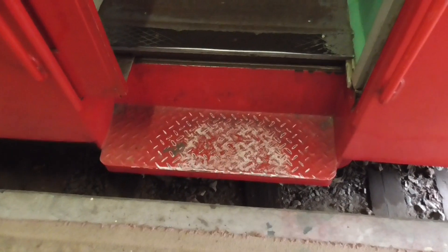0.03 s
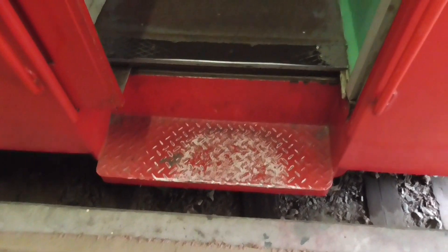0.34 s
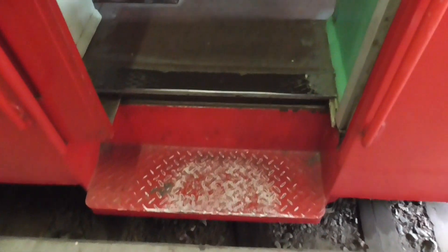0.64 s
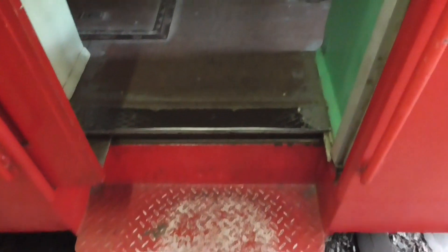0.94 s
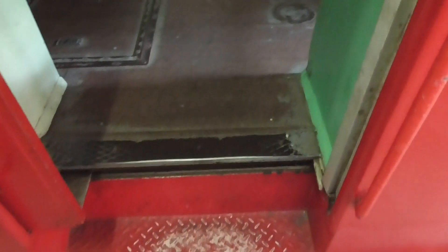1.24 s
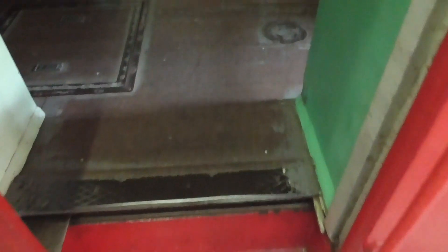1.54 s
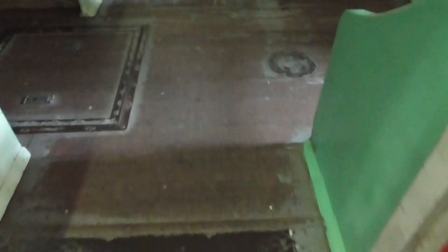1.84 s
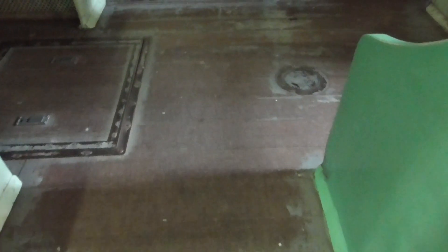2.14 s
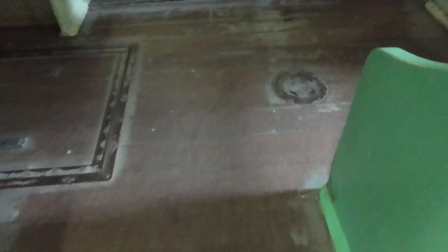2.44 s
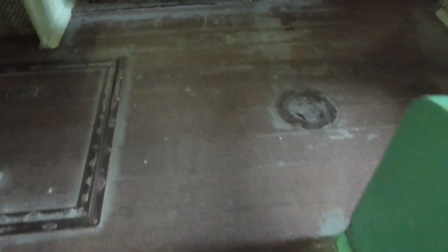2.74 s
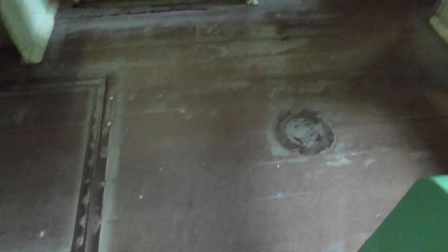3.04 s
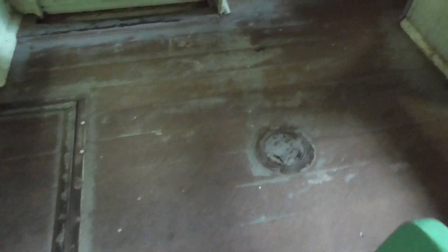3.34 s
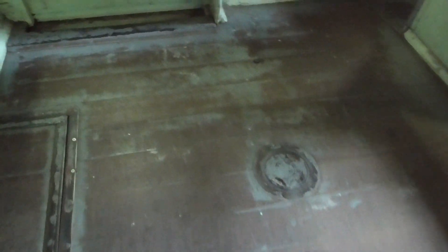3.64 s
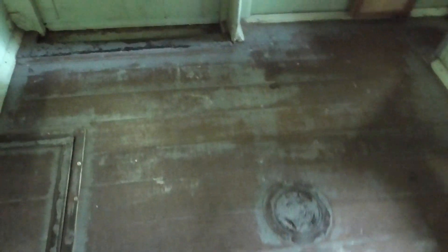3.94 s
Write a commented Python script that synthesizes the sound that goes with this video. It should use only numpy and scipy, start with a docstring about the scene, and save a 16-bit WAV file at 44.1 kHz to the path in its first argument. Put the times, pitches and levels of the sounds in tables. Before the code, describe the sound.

A standing train hisses air with thin whistles, then sounds quieter inside, with soft footsteps.

```python
"""A steady hiss of air or steam comes from a standing train, ringing with broad pipe tones and thin whistles.
The listener passes through the carriage door, which shuts out the direct hiss.
A softer hiss, spread out by echoes inside the carriage, remains over a low rumble.
A faint hum comes and goes on the way in, and later soft footsteps thump on the hollow floor."""
import sys
import numpy as np
from scipy import signal
from scipy.fft import rfft, irfft, next_fast_len
from scipy.io import wavfile
from scipy.ndimage import uniform_filter1d

SR = 44100
rng = np.random.default_rng(int(sys.argv[2]) if len(sys.argv) > 2 else 0)


def generate_wav(signal):
    """Clip the signal to [-1, 1] and save it as 16-bit WAV at the path in sys.argv[1]."""
    frames = np.transpose(np.atleast_2d(signal))
    scaled = np.clip(frames, -1, 1) * 32767
    pcm = np.round(scaled).astype(np.int16)
    wavfile.write(sys.argv[1], SR, pcm)


N = 176400
FRAME, HOP = 2048, 512  # noise is shaped in short overlapping frames; both in samples
HZ = np.fft.rfftfreq(FRAME, 1 / SR)[:, None]
TIMES = np.arange(N // HOP + 2) * HOP / SR


def amp(db):
    """Turn decibels into a gain."""
    return 10 ** (np.asarray(db) / 20)


def over_pitch(rows):
    """Join rows that start with a pitch into one curve per remaining column."""
    hz, *columns = np.transpose(rows)
    return [np.interp(np.log(HZ + 1), np.log(hz), column) for column in columns]


def over_time(rows):
    """Join rows that start with a time into one curve per remaining column."""
    time_s, *columns = np.transpose(rows)
    return [np.interp(TIMES, time_s, column) for column in columns]


def bell(x, centre, width):
    """A smooth bump of height 1."""
    return np.exp(-.5 * ((x - centre) / width) ** 2)


def whistle_peak(hz):
    """A whistle lifts only a very narrow band around its pitch."""
    return bell(HZ, hz, 0.0056 * hz)


def low_cut_db(edge_hz):
    """A steep fall in level below the edge."""
    return -10 * np.log10(1 + (edge_hz / (HZ + 1)) ** 4)


def patches(depth_db, bands, frames):
    """Random rises and dips in level, smoothed over nearby pitch bands and frames."""
    field = rng.standard_normal((len(HZ), len(TIMES)))
    field = uniform_filter1d(uniform_filter1d(field, bands, axis=0), frames, axis=1)
    return depth_db * field / np.sqrt(np.mean(field ** 2))


def ridges():
    """Reflections cut fine, slowly shifting ridges into a hiss."""
    return patches(depth_db=3, bands=2, frames=40)


def shaped_noise(level_db, stereo, pan_db=0, lead_s=0):
    """Stereo noise with the given level per Hz; a likeness of 1 feeds both ears the same noise."""
    likeness, lead_rad, left_db = over_pitch(stereo)
    white = rng.standard_normal((2, N + FRAME))
    common, apart = signal.stft(white, nperseg=FRAME, noverlap=FRAME - HOP)[2][..., :len(TIMES)]
    angle = np.arccos(np.clip(likeness, 0, 1)) / 2
    common, apart = np.cos(angle) * common, np.sin(angle) * apart
    # one ear hears it louder and earlier than the other
    lean = amp((left_db + pan_db) / 2) * np.exp(.5j * (lead_rad + 2 * np.pi * HZ * lead_s))
    ears = np.array([(common + apart) * lean, (common - apart) / lean])
    gain = amp(level_db) * np.sqrt(SR / (abs(lean) ** 2 + abs(lean) ** -2))
    return signal.istft(ears * gain, nperseg=FRAME, noverlap=FRAME - HOP)[1][:, :N]


def jet_hiss():
    """The jet rings in a pipe and whistles; its tone shifts as the listener moves, then it is shut out."""
    # tone of the direct hiss: pitch_hz, level_db
    tone = [(450, -16), (750, -9), (1000, -6.5), (1150, 0.3), (1420, 2), (1750, -7.5), (2200, 0.75),
            (2700, -6.5), (3150, -1.1), (3500, -2), (4000, 7), (4400, 8), (4900, 3.5), (5500, -1.0),
            (6400, -0.5), (6950, 5.5), (7500, 11), (7900, 9.5), (8500, 3), (9400, 2), (10600, 9.5),
            (11700, 5.5), (12300, 6.5), (13500, -4), (15200, -13.5)]
    # its loudness on the way in: time_s, level_db
    loudness = [(0, -69), (.6, -68), (1.2, -68.5), (1.5, -70.5), (1.85, -72), (2.2, -68.5), (2.5, -73),
                (2.68, -78), (3.0, -89), (4, -102)]
    # the treble against the rest: time_s, boost_db
    treble = [(0, -10), (1.15, -4.5), (1.7, -2.5), (2.2, -7.5), (2.7, -1), (3.2, -8)]
    # the upper middle, which swells in the doorway: time_s, boost_db
    middle = [(0, -3), (1.5, -1.5), (2.3, 2), (2.7, 4.5)]
    # the two lower pipe tones: time_s, pitch_hz, boost_db
    first_pipe = [(0, 1430, 9), (.7, 1432, 6.5), (1.05, 1362, 10.5), (1.6, 1385, 4), (2.2, 1525, 6),
                  (2.7, 1446, 12.5)]
    second_pipe = [(0, 4130, 5.5), (1.1, 4540, 1), (1.5, 4170, -2.5), (2.2, 4140, -2), (2.7, 4100, -1)]
    # the high pipe tone: time_s, pitch_hz, boost_db, left_over_right_db
    high_pipe = [(0, 7350, -1, 2), (.55, 7550, 2.5, 4.5), (1.2, 7320, 4, -7), (1.7, 7660, 5.5, -7.5),
                 (1.88, 7860, 5.5, -7), (2.25, 7800, 3.5, -3), (2.48, 7650, 1.5, -1.5), (2.7, 7600, -4, -3)]
    # whistles that swell and fade: pitch_hz, boost_db, strongest_s, spread_s
    whistles = [(1128, 8.5, 1.3, 0.48), (1367, 0, 1.02, 0.12), (1470, 1, 0.95, 2.3), (2026, 4, 1, 1),
                (2140, 1.5, 0.44, 1.8), (3986, 10, 0.2, 0.28), (4325, 5.5, 1.13, .4), (4530, 7, 1.2, 0.6),
                (4835, 8.5, .5, 0.91), (4800, 10, 1.77, .14), (4240, 10.5, 2.57, 0.11),
                (7510, -0.5, 1.1, 0.24), (7340, 11, 1.68, 0.13), (7660, 6, 2.24, .22)]
    # the hiss at the two ears: pitch_hz, likeness (0-1), left_lead_radians, left_over_right_db
    stereo = [(500, 0.93, .05, 0), (1400, 0.91, .25, 1), (2800, 0.85, 0.3, 0.1), (4330, 0.81, 1.62, 1),
              (4480, 0, 1, 10), (4990, 0.87, 0.55, 2), (5670, 1, 1.03, 3), (7330, 1, 1.22, -1),
              (9960, 0.58, 3.4, 1), (11700, 0.69, 2.95, -5), (14700, 0.05, 6.1, 0)]
    # the jet's direction, at first to the left: time_s, left_over_right_db, left_lead_s
    direction = [(.2, 2.5, .000012), (.8, -0.5, 0), (2.2, 0.7, -.000006)]
    first_hz, first_db = over_time(first_pipe)
    second_hz, second_db = over_time(second_pipe)
    high_hz, high_db, high_pan_db = over_time(high_pipe)
    high_band = bell(HZ, high_hz, width=340)
    pipe_db = first_db * bell(HZ, first_hz, width=37) + second_db * bell(HZ, second_hz, width=245)
    pipe_db += high_db * high_band
    treble_db = over_time(treble)[0] * HZ ** 4 / (HZ ** 4 + 7700 ** 4)  # mostly above 7700 Hz
    middle_db = over_time(middle)[0] * bell(HZ, centre=2970, width=1180)
    tone_db = over_pitch(tone)[0] + low_cut_db(edge_hz=110) + treble_db + middle_db
    whistle_db = sum(db * whistle_peak(hz) * bell(TIMES, strongest_s, spread_s)
                     for hz, db, strongest_s, spread_s in whistles)
    drift_db = ridges() + patches(depth_db=.5, bands=25, frames=12)
    flutter_db = patches(depth_db=.83, bands=200, frames=3)
    level_db = over_time(loudness)[0] + tone_db + pipe_db + whistle_db + drift_db + flutter_db
    pan_db, lead_s = over_time(direction)
    return shaped_noise(level_db, stereo, pan_db + high_pan_db * high_band, lead_s)


def carriage_hiss():
    """The hiss after it has bounced many times around the carriage."""
    # tone of the hiss inside: pitch_hz, level_db
    tone = [(450, -6), (800, -10.5), (1100, -6), (1480, -0.8), (1800, -13), (2250, -12.5), (2800, -17),
            (3400, -12), (4300, 1), (5200, -14), (6100, -18.5), (6800, -14), (7550, -1), (8300, -14.5),
            (9400, -15.5), (10700, -5.5), (11800, -12), (12800, -13), (15300, -55)]
    # its loudness: time_s, level_db
    loudness = [(0, -73), (2.3, -81.5), (2.8, -68.5), (3.4, -69.5), (4, -71)]
    # thin whistles in it: pitch_hz, boost_db
    whistles = [(1448, 3), (1535, 9)]
    # the hiss at the two ears: pitch_hz, likeness (0-1), left_lead_radians, left_over_right_db
    stereo = [(500, 0.81, 0.16, 0), (1300, 0.62, 0.22, -1.8), (2700, 1, 0.22, -0.49),
              (4200, 0.56, 0.38, -0.74), (6100, 0.8, 0, 0), (8500, .1, 0.096, -0.67)]
    tone_db = over_pitch(tone)[0] + low_cut_db(edge_hz=550)
    whistle_db = sum(db * whistle_peak(hz) for hz, db in whistles)
    drift_db = ridges() + patches(depth_db=1, bands=25, frames=12)
    return shaped_noise(over_time(loudness)[0] + tone_db + whistle_db + drift_db, stereo)


def rumble():
    """Low background noise that wavers at random."""
    # tone of the rumble: pitch_hz, level_db
    tone = [(45, -21), (75, -15.5), (100, -11), (135, 0), (190, -7.5), (250, -4.5), (340, -9), (480, -11),
            (800, -33)]
    # its loudness: time_s, level_db
    loudness = [(0, -74.5), (1.05, -69.5), (1.3, -76), (1.75, -77), (2.45, -69.5), (3.1, -71.7)]
    # the rumble at the two ears: pitch_hz, likeness (0-1), left_lead_radians, left_over_right_db
    stereo = [(120, 0.97, 0, -1.9), (400, 0.89, 0, -0.63)]
    drift_db = patches(depth_db=3.5, bands=3, frames=14)
    return shaped_noise(over_time(loudness)[0] + over_pitch(tone)[0] + drift_db, stereo)


def hum(strongest_s=1.03, spread_s=0.4 / 3, pitch_hz=241, level_db=-49):
    """One faint, pure tone that briefly swells and fades."""
    t = np.arange(N) / SR
    return amp(level_db) * bell(t, strongest_s, spread_s) * np.sin(2 * np.pi * pitch_hz * t)


def footsteps(knock_hz=560, knock_width_s=0.00074, rise_s=0.0019, echo_db=-15, echo_s=.25, pan_db=-2.5):
    """The heel knocks, then the sole lands and rings the floor tones near the pitch of its push."""
    # tones of the hollow floor: pitch_hz, level_db, fade_s (time to fall 60 dB)
    floor = [(99, -11, 0.47), (178, 7, 0.0374), (239, -1.5, 0.066), (283, -9.5, 0.5), (295, 1, 0.055),
             (392, -8.5, 0.18), (487, -14.5, 0.3), (660, -14, 0.092)]
    # footfalls: start_s, level_db, push_hz, push_width_octaves, fade_share, knock_boost_db, sole_delay_s
    steps = [(2.404, -19.5, 224, 0.12, 0.7, -26, 0.00063), (2.501, -17, 340, 0.35, 1.0, -13, 0.002),
             (3.571, -18.5, 135, 1.35, .58, -0.5, .0052), (3.607, -27.5, 219, 0.51, .55, -22, 0.0052)]
    t = np.arange(SR // 2) / SR
    knock_t = t - 2 * knock_width_s
    knock = -bell(knock_t, 0, knock_width_s) * np.sin(2 * np.pi * knock_hz * knock_t)
    track = np.zeros((2, N + SR))
    for start_s, level_db, push_hz, octaves, fade_share, knock_db, delay_s in steps:
        age = np.maximum(t - delay_s, 0)
        ring = np.zeros(len(t))
        for hz, db, fade_s in floor:
            push = bell(np.log2(hz), np.log2(push_hz), octaves)
            ring += push * amp(db - 60 * age / (fade_s * fade_share)) * np.sin(2 * np.pi * hz * age)
        rise = 1 - np.exp(-(age / rise_s) ** 2)
        thump = amp(level_db) * (amp(knock_db) * knock + ring * rise)
        room = rng.standard_normal(len(t)) * amp(-60 * t / echo_s)
        thump += amp(echo_db) * signal.fftconvolve(thump, room / np.linalg.norm(room))[:len(t)]
        start = round(start_s * SR)
        track[:, start:start + len(t)] += thump * amp([[pan_db / 2], [-pan_db / 2]])
    bass_cut = signal.butter(4, 80, "highpass", fs=SR, output="sos")  # below 80 Hz
    return signal.sosfilt(bass_cut, track[:, :N])


def scene():
    """Hiss from outside and inside, rumble, hum and feet, added together."""
    return jet_hiss() + carriage_hiss() + rumble() + hum() + footsteps()


def record(dry):
    """Remove the very highest treble."""
    top_hz = 15300
    size = next_fast_len(N + SR // 2)
    kept = np.fft.rfftfreq(size, 1 / SR) < top_hz
    return irfft(rfft(dry, size) * kept, size)[:, :N]


dry = scene()
out = record(dry)
generate_wav(out)
```